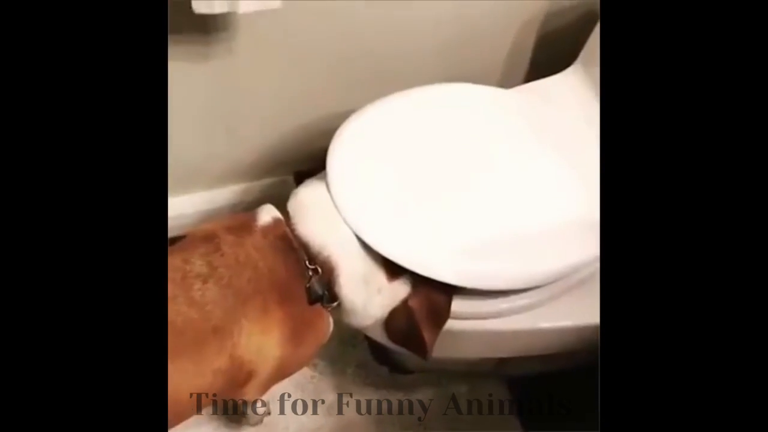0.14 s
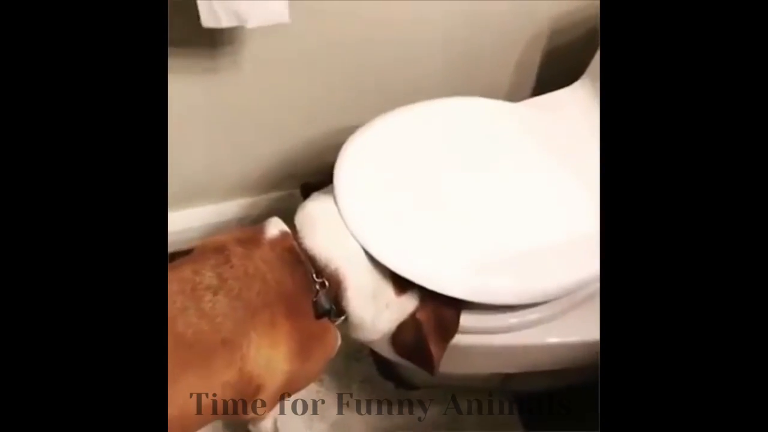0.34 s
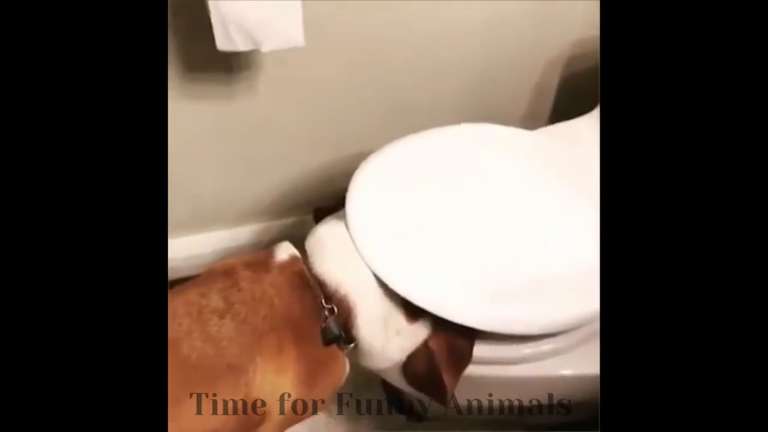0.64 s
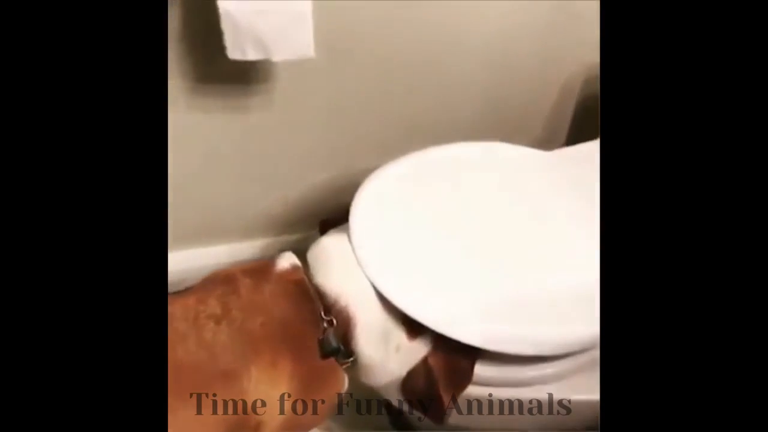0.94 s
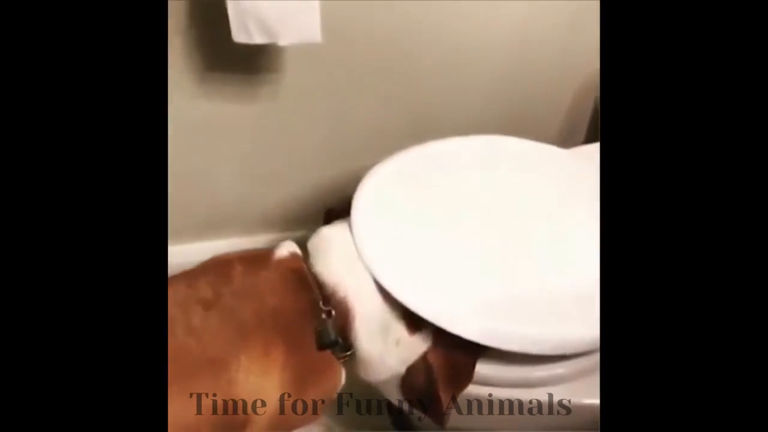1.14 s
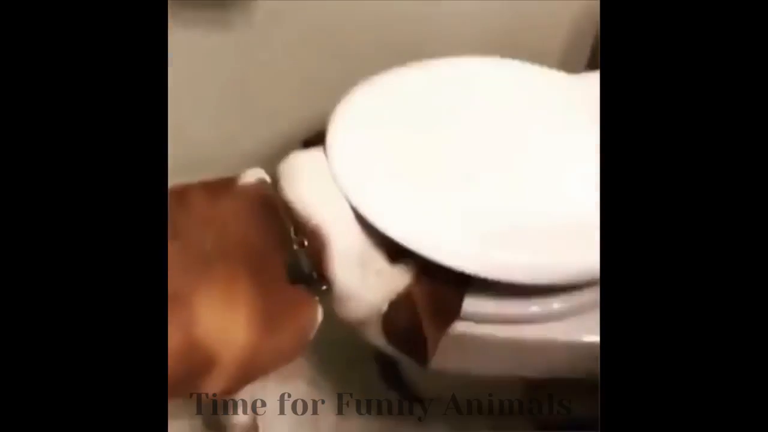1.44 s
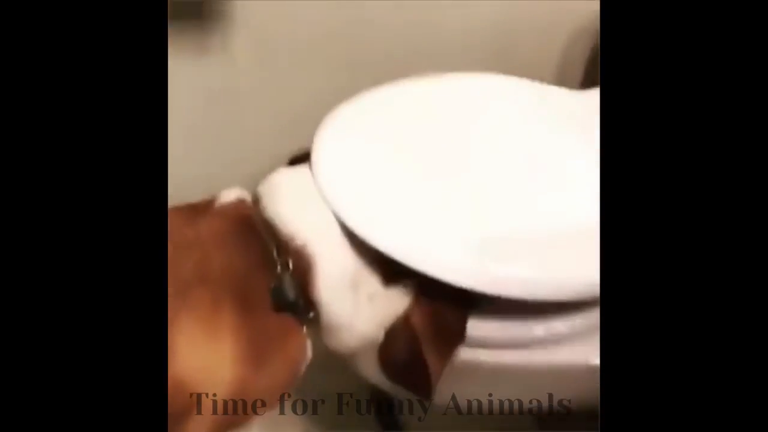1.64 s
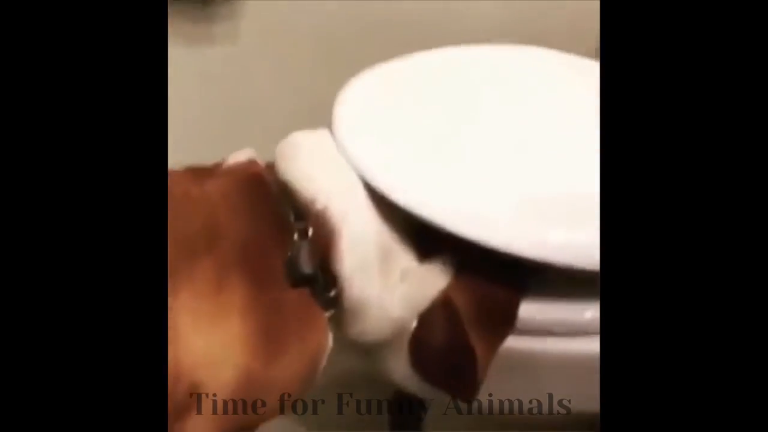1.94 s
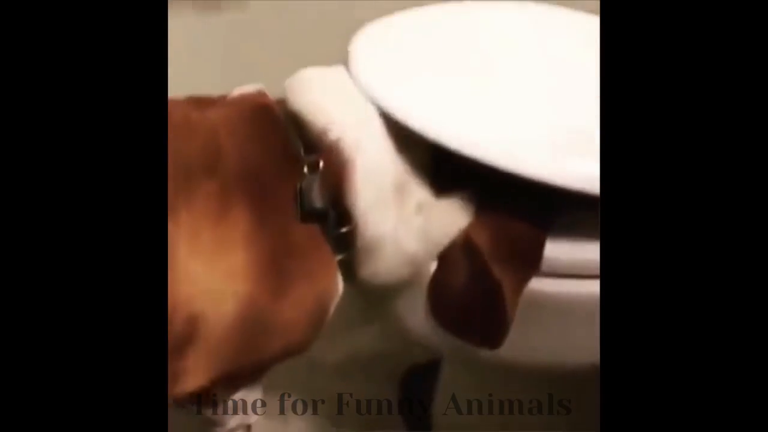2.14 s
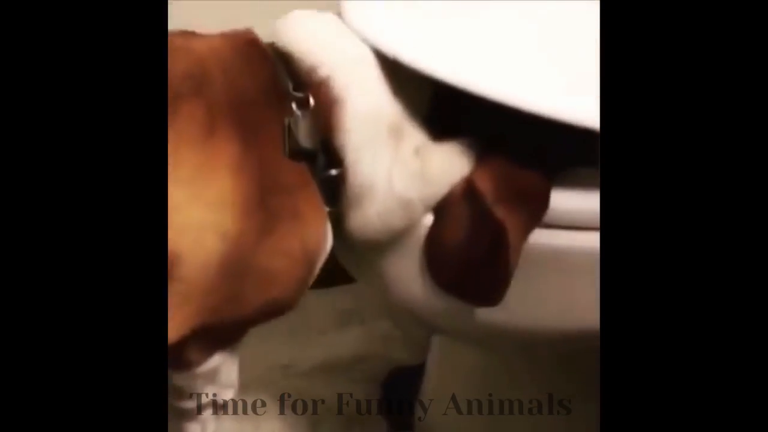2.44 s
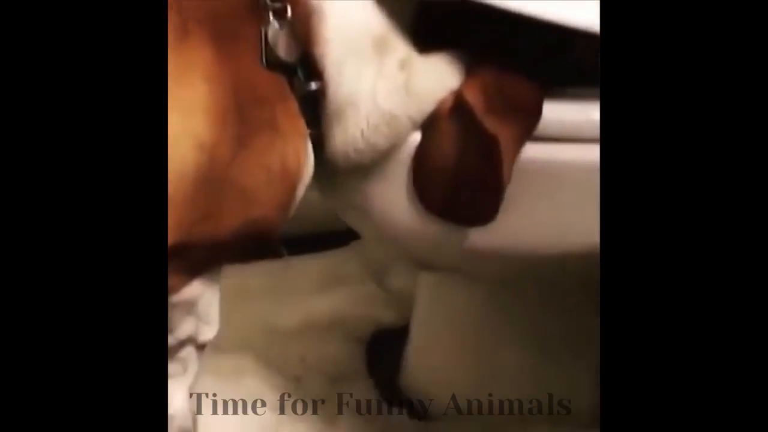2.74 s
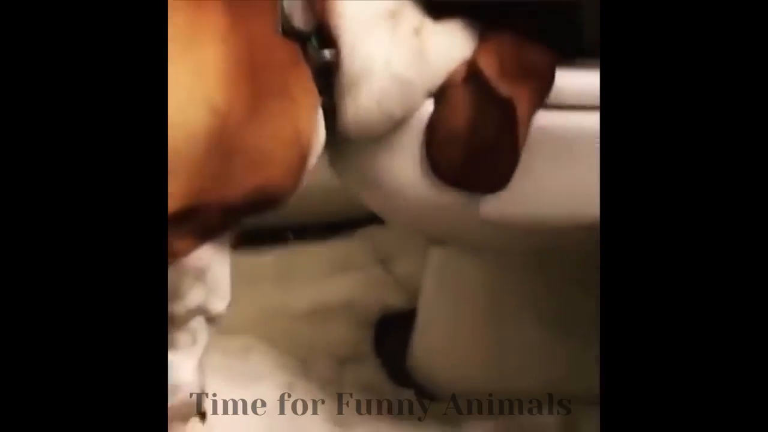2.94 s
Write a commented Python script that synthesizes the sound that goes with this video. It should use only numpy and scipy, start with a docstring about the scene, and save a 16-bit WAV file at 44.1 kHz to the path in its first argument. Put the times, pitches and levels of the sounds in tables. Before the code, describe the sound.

Fast slurpy dog lapping in a ceramic bowl under a half-closed lid, with bubbly plops, bright splashes and low hollow gulps, over faint hum and a slightly growing low rumble, heard close in mono in a bathroom.

```python
"""Dog lapping water from a toilet bowl

A dog laps water from a ceramic bowl under a half-closed lid, in a small hard bathroom, heard in mono.
Trapped bubbles ring as rising damped sines; slaps throw filtered noise and showers of droplet tones;
scoops pump the air under the lid, whose modes boom; small bubbles and noise churn with each lap.
Bowl resonances and decaying noise echoes colour the water, over faint hum, hiss and a low rumble."""
import sys
import numpy as np
from scipy import signal
from scipy.fft import rfft, irfft, next_fast_len
from scipy.io import wavfile
from scipy.ndimage import map_coordinates

SR = 44100
rng = np.random.default_rng(int(sys.argv[2]) if len(sys.argv) > 2 else 0)


def volts(x):
    """Linear amplitude factor 10**(x/20) for a level x in dB, scalar or array-like."""
    e = np.asarray(x, float) / 20
    return 10 ** e


def waveform_to_disk(signal):
    """Save audio, clipped to [-1, 1], as 16-bit WAV at the path in sys.argv[1]."""
    frames = np.transpose(np.atleast_2d(signal))
    scaled = np.clip(frames, -1, 1) * 32767
    samples = np.round(scaled).astype(np.int16)
    wavfile.write(sys.argv[1], SR, samples)


N = 136710  # length [samples]

# Steady hum and hiss, relative density: (frequency [Hz], level [dB per Hz])
HUM_SPECTRUM = [(24, -17), (40, 21.5), (616, 7.5), (1070, -26), (1950, 4.5), (8410, -61), (12400, -27)]
# Low rumble near the microphone, before its random lumps: (time [s], level [dB])
RUMBLE_LEVEL = [(0, -74.5), (1.9, -67.5), (3.1, -60.5)]
# Colour of the rumble, relative density: (frequency [Hz], level [dB per Hz])
RUMBLE_SPECTRUM = [(28, -22), (50, 0), (100, -3), (140, -16), (400, -70)]
# Laps that stir the water: (time [s], level [dB], time from onset to fall [s])
LAPS = [(-.2, -51.5, .2), (0.052, -55.5, 0.26), (0.375, -52.5, 0.27), (0.74, -49.5, 0.26),
        (1.115, -49.5, 0.22), (1.442, -53, 0.26), (1.91, -55, 0.3), (2.333, -51.5, 0.17),
        (2.589, -64, 0.051), (2.777, -52.5, 0.23)]
# Noise of sloshing water, relative density: (frequency [Hz], level [dB per Hz])
SLOSH_SPECTRUM = [(71, -94), (120, -9), (207, -0.5), (431, -16), (1460, -8), (1710, -18.5), (4090, -17.5),
                  (10400, -22.5), (12400, -45)]
# Noise of spray, relative density: (frequency [Hz], level [dB per Hz])
SPRAY_SPECTRUM = [(720, -16), (1480, -4.5), (3860, -6.5), (5070, -9), (9680, -9), (12400, -9)]
# Scoops that pump the air under the lid:
# (time [s], relative level [dB], centre of excitation [Hz], share of the free ring time [ratio])
GULPS = [(0.009, -32, 236.6, 0.22), (0.085, -35.5, 287, 0.53), (0.26, -41, 271, 0.97),
         (0.463, -41.5, 281, 0.84), (0.58, -46.5, 282, 0.81), (0.822, -38.5, 292, 0.97),
         (0.914, -28, 320, 0.88), (1.181, -31, 318, 0.65), (1.523, -50, 145, 0.68), (1.653, -36, 200, 0.65),
         (1.799, -51, 217, 1), (1.998, -40.5, 360, 0.84), (2.045, -37, 235, 0.83),
         (2.164, -33.5, 188, 0.45), (2.36, -39, 215, 0.91), (2.483, -34, 210, 0.85),
         (2.624, -43, 191, 0.52), (2.847, -37, 223, 1), (2.884, -33.5, 218, 0.8), (2.897, -30, 370, 0.52),
         (3.03, -38, 201, 0.44)]
# Modes of the air under the lid: (mean frequency [Hz], mean gain [dB], free 60 dB decay [s])
CAVITY_MODES = [(93, 25, 0.072), (150.7, 5, 0.17), (206.6, 5, 0.3), (302, 8.5, 0.28), (344, 7.5, 0.13),
                (467, 9.5, 0.16), (567.8, 14.5, 0.15)]
# Slaps that throw spray: (time [s], relative level [dB], centre pitch [Hz], shower length [s])
SPLASHES = [(0.0733, -34, 4800, 0.049), (0.1175, -33, 4150, 0.018), (0.216, -32.5, 6070, 0.024),
            (0.263, -33.5, 3480, 0.12), (0.4325, -37, 4130, 0.038), (0.53, -34, 4300, 0.066),
            (0.582, -30.5, 4120, 0.05), (0.7682, -48, 3380, 0.029), (0.8073, -30.5, 3500, 0.049),
            (0.8764, -19, 3730, 0.031), (1.112, -41.5, 3440, 0.08), (1.171, -31, 3220, 0.072),
            (1.233, -20.5, 2890, 0.047), (1.278, -30.5, 4400, 0.072), (1.437, -41.5, 3880, 0.013),
            (1.529, -25.5, 3340, 0.069), (1.5915, -30.5, 3250, 0.084), (1.6424, -34.5, 5640, 0.033),
            (1.6674, -29.5, 2660, 0.027), (1.8965, -46, 4060, 0.082), (1.951, -32.5, 3080, 0.058),
            (1.988, -30, 3230, 0.057), (2.033, -31.5, 3505, 0.041), (2.1045, -21.5, 5590, 0.027),
            (2.154, -26, 3550, 0.045), (2.274, -43.5, 7980, 0.031), (2.3219, -32.5, 2990, 0.033),
            (2.3544, -25.5, 4320, 0.036), (2.4307, -21.5, 3880, 0.029), (2.475, -33.5, 5200, 0.11),
            (2.808, -32, 3070, 0.043), (2.885, -31, 3330, 0.04), (2.9613, -32.5, 5000, 0.037),
            (3.0096, -32.5, 4020, 0.095)]
# Bubbles trapped by the tongue: (time [s], relative level [dB], starting pitch [Hz], 60 dB decay [s])
PLOPS = [(0.116, -33, 722, 0.046), (0.157, -34, 1446, 0.042), (0.216, -34, 577, 0.066),
         (0.288, -36, 2030, 0.039), (0.328, -48.5, 2096, 0.069), (0.412, -42.5, 1480, 0.04),
         (0.453, -32.5, 1890, 0.018), (0.46, -26.5, 1520, 0.015), (0.541, -33.5, 1544, 0.031),
         (0.551, -32.5, 1950, 0.024), (0.809, -20, 1405, 0.018), (0.817, -29, 765, 0.021),
         (0.826, -26, 1793, 0.0092), (0.882, -17, 751, 0.019), (0.911, -26, 1496, 0.024),
         (1.117, -37.5, 843, 0.032), (1.173, -22.5, 1420, 0.018), (1.235, -24, 769, 0.021),
         (1.259, -45.5, 772, 0.023), (1.522, -17, 828, 0.01), (1.589, -35.5, 642, 0.037),
         (1.639, -36.5, 513, 0.041), (1.668, -35, 2550, 0.011), (1.941, -38.5, 670, 0.055),
         (1.955, -40.5, 1194, 0.057), (2.026, -38.5, 1540, 0.021), (2.049, -35.5, 500, 0.034),
         (2.121, -37, 1780, 0.015), (2.156, -33, 1129, 0.026), (2.325, -29, 1955, 0.018),
         (2.355, -30, 1642, 0.024), (2.614, -47, 626, 0.038), (2.63, -53, 2286, 0.025),
         (2.819, -29.5, 1228, 0.02), (2.827, -33.5, 1037, 0.039), (2.889, -28.5, 2126, 0.011),
         (2.889, -38.5, 490, 0.047), (2.984, -24.5, 1762, 0.011), (2.994, -38, 687, 0.037)]
# Resonances of the ceramic and its air: (frequency [Hz], width [Hz], gain [dB])
BOWL_MODES = [(520, 20, 4), (720, 25, 3), (910, 20, 4), (1062, 25, 1), (1211, 16, 6), (1480, 16, 6),
              (1860, 25, 3), (2205, 25, 2), (2767, 35, 3)]
# Reverberation of the room: (frequency [Hz], 60 dB decay [s])
ROOM_DECAY = [(200, 0.37), (1500, 0.26), (4000, 0.41), (10000, 0.14)]

HUM_DB = -65
STIR_RISE_S, STIR_FALL_S, STILL_DB = 0.056, 0.038, -73
FIZZ_DB, SLOSH_DB, MIST_DB = -5, -8.5, -16
GULP_DB, GULP_OCTAVES, GULP_RISE_S = -5, 0.35, 0.0091
CRACK_DB, CRACK_S = -16, 0.011  # bright edge of a sharp slap and its 60 dB decay
PUFF_DB, PUFF_OCTAVES = -10, 0.55
PING_DB, PING_S = 4, 0.0074
SHARP_S = 0.032  # longer showers start softly, with less crack and ping
DROPS_DB, DROP_OCTAVES, DROP_CYCLES = -6, 0.4, 22  # cycles in a droplet's 60 dB decay
PLOP_DB, PITCH_RISE = 3.5, 0.032  # rise as a fraction of the starting pitch
SLAP_DB, SLAP_RISE_S = -14.5, 0.0031
EARLY_DB, EARLY_S = 1.5, 0.03  # quick flutter inside the bowl, over the room's tail
ROOM_DB = -2
TOP_HZ = 12450


def curve(points, at, log=False):
    """Linear interpolation through (x, value) points, optionally on a logarithmic x axis."""
    x, v = np.transpose(points)
    if log:
        return np.interp(np.log(at + 1), np.log(x + 1), v)
    return np.interp(at, x, v)


def unit(x):
    """Normalization to a root-mean-square of 1."""
    return x / np.sqrt(np.mean(x ** 2) + 1e-20)


def filtered(x, response):
    """Linear filtering: the spectrum is multiplied by a response given as a function of frequency."""
    m = next_fast_len(len(x) + SR // 2)
    return irfft(rfft(x, m) * response(np.fft.rfftfreq(m, 1 / SR)), m)[:len(x)]


def noise(spectrum):
    """Spectral shaping of white noise, at rms 1."""
    white = rng.standard_normal(N)
    return unit(filtered(white, lambda hz: volts(curve(spectrum, hz, log=True))))


def wobble(rate):
    """Slow random modulation: a spline through random knots, rate of them a second."""
    knots = rng.standard_normal(int(N * rate / SR) + 4)
    return map_coordinates(knots, [np.arange(N) * rate / SR])


def add(out, s, x):
    """Superposition: mixes x into out from time s [s]."""
    part = out[max(round(s * SR), 0):][:len(x)]
    part += x[:len(part)]


def bubble(t, hz, life_s, rise):
    """Bubble resonance: a damped sine whose pitch climbs as the bubble nears the surface."""
    t = np.maximum(t, 0)
    climb = rise * life_s * (t / life_s - 1 + np.exp(-t / life_s))
    phase = 2 * np.pi * hz * (t + climb)
    onset = 1 - np.exp(-t * hz * 0.32)
    return np.sin(phase) * volts(-60 * t / life_s) * onset


def hum():
    """Stationary noise: the hum and hiss of the room, with a lumpy low rumble at the microphone."""
    rumble_db = curve(RUMBLE_LEVEL, np.arange(N) / SR) + 2.5 * wobble(8)
    rumble = volts(rumble_db) * noise(RUMBLE_SPECTRUM)
    return volts(HUM_DB + 1.8 * wobble(6.1)) * noise(HUM_SPECTRUM) + rumble


def stirring():
    """Amplitude envelope of driven turbulence: up with each lap, decaying exponentially after it."""
    s, db, hold = np.transpose(LAPS)[:, :, None]
    t = np.arange(N) / SR - s
    rise = np.clip(t / STIR_RISE_S, 0, 1)
    fall = np.exp(-np.maximum(t - hold, 0) / STIR_FALL_S)
    return volts(STILL_DB) + (volts(db) * rise * fall).sum(0)


def churn(count=2200):
    """Entrained air: many small random bubbles over sloshing noise and mist, all under the stirring."""
    r, t = rng.random((count, 3)), np.arange(1200) / SR
    spread = 0.802 * rng.standard_normal((count, 1))
    hz = 1900 * np.exp(spread).clip(0.2, 4.5)
    size = volts(-3 * np.log(r[:, 1:2] + 0.03))  # few loud, many faint
    tones = bubble(t, hz, 20 / hz, 0.35) * size
    at = (r[:, :1] * N).astype(int) + np.arange(len(t))
    fizz = volts(FIZZ_DB) * unit(np.bincount(at.ravel(), tones.ravel())[:N])
    slosh = volts(SLOSH_DB + 2.0 * wobble(39.8)) * noise(SLOSH_SPECTRUM)
    mist = volts(MIST_DB + 4.5 * wobble(66)) * noise(SPRAY_SPECTRUM)
    return stirring() * volts(2.5 * wobble(14)) * (fizz + slosh + mist)


def gulps():
    """Cavity resonance: each scoop swells the air modes near its own pitch, unevenly."""
    out, t = np.zeros(N), np.arange(SR // 3) / SR
    f, level, t60 = np.transpose(CAVITY_MODES)[:, :, None]
    swell = 1 - np.exp(-(t / GULP_RISE_S) ** 2)
    draws = rng.standard_normal((len(GULPS), 2, len(CAVITY_MODES), 1))
    for (s, db, hz, share), r in zip(GULPS, draws):
        near = 1 / (1 + (np.log2(f / hz) / GULP_OCTAVES) ** 2)
        gain = near * volts(level + 1.5 * r[0])
        pitch = f * (1 + 0.018 * r[1])
        ring = gain * volts(-60 * t / (t60 * share)) * np.sin(2 * np.pi * pitch * t)
        add(out, s - GULP_RISE_S, volts(db + GULP_DB) * ring.sum(0) * swell)
    return out * volts(3.5 * wobble(60))


def splashes(count=26):
    """Impact and breakup: a crack, a ping, a puff of spray around its pitch, then thinning droplets."""
    out, t = np.zeros(N), np.arange(SR // 6) / SR
    spray = noise(SPRAY_SPECTRUM) * volts(4 * wobble(250))
    draws = rng.standard_normal((len(SPLASHES), 3, count, 1))
    for (s, db, hz, length), r in zip(SPLASHES, draws):
        sharp = min(SHARP_S / length, 1) ** 2
        start = int(np.abs(np.sin(9 * r[0, 0, 0])) * (N - len(t)))  # a random stretch of spray
        puff = spray[start:][:len(t)]
        crack = sharp * puff * volts(CRACK_DB - 60 * t / CRACK_S)
        puff = unit(filtered(puff, lambda f: 1 / (1 + (np.log2((f + 1) / hz) / PUFF_OCTAVES) ** 2)))
        burst = puff * volts(PUFF_DB - 40 * t / length) * (1 - np.exp(-t * sharp / 0.0016))
        ping = sharp * volts(PING_DB) * bubble(t, hz, PING_S, PITCH_RISE)
        lag = 0.6 * length * np.abs(r[0])
        pitch = np.clip(hz * 2 ** (DROP_OCTAVES * r[1]), 1100, 11500)
        drop_gain = volts(DROPS_DB + 2.0 * r[2] - 12 * lag / length)
        drops = drop_gain * bubble(t - lag, pitch, DROP_CYCLES / pitch, 0.12)
        add(out, s - 0.001, volts(db) * (crack + burst + drops.sum(0) + ping))
    return out


def plops():
    """Free oscillation of trapped bubbles: each rings, with weaker late neighbours and a noise slap."""
    out, t = np.zeros(N), np.arange(SR // 8) / SR
    slosh = noise(SLOSH_SPECTRUM)
    for (s, db, hz, life), r in zip(PLOPS, rng.random((len(PLOPS), 3, 3, 1))):
        late_hz = hz * (0.712 + 0.977 * r[1])
        late = 0.18 * r[2] * bubble(t - 0.037 * r[0], late_hz, life * 3.07, PITCH_RISE)
        ring = bubble(t, hz, life, PITCH_RISE) + late.sum(0)
        fade = volts(SLAP_DB - 60 * t / (2.35 * life)) * (1 - np.exp(-t / SLAP_RISE_S))
        start = int(r[0, 0, 0] * (N - len(t)))
        slap = fade * slosh[start:][:len(t)]
        add(out, s - 0.001, volts(db + PLOP_DB) * (ring + slap))
    return out


def bowl(x):
    """Modal resonance: the ceramic and its air add fixed resonant peaks to the direct sound."""
    def response(f):
        """Sum of second-order resonances and the direct path."""
        return 1 + sum(volts(db) * 1j * f * w / (c * c - f * f + 1j * f * w) for c, w, db in BOWL_MODES)
    return filtered(x, response)


def room(x, count=16):
    """Reverberation: quick flutter and a tail dying by band, drawn anew as dog and microphone move."""
    out = np.zeros(N)
    for part in np.array_split(np.arange(N), count):
        hz, t, z = signal.stft(rng.standard_normal(SR // 2), SR, nperseg=128)
        late = volts(-60 * t / curve(ROOM_DECAY, hz, log=True)[:, None])
        early = volts(EARLY_DB - 60 * t / EARLY_S)
        tail = signal.istft(z * (late + early), SR, nperseg=128)[1]
        echo = signal.fftconvolve(x[part], tail / np.linalg.norm(tail))
        add(out, part[0] / SR + 0.002, echo)
    return out


def scene():
    """Superposition of direct and reverberant sound: water in the bowl, bowl in the room."""
    water = bowl(plops() + splashes() + churn())
    boom = gulps()
    echoes = volts(ROOM_DB) * room(water + 0.44 * boom)
    return (water + boom + echoes + hum())[None]


def top_cut(x):
    """Nothing passes above the cut-off."""
    return signal.sosfilt(signal.butter(12, 12500, fs=SR, output="sos"), x)


def record(dry):
    """Band limitation: the treble slopes to nothing over the last 800 Hz below TOP_HZ."""
    limited = filtered(dry[0], lambda hz: np.clip((TOP_HZ - hz) / 800, 0, 1))
    return top_cut(limited[None])


dry = scene()
out = record(dry)
waveform_to_disk(out)
```